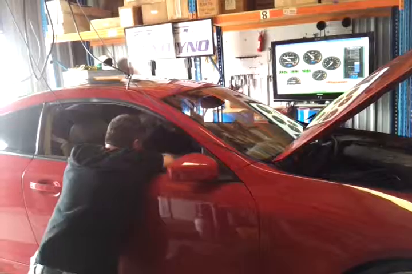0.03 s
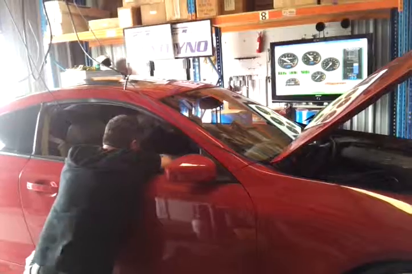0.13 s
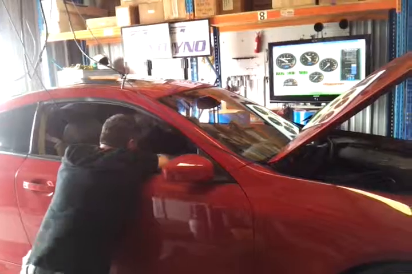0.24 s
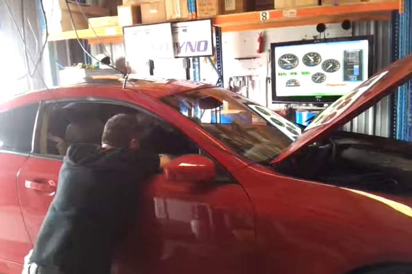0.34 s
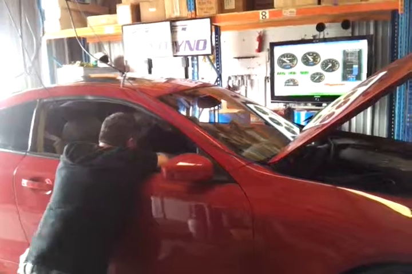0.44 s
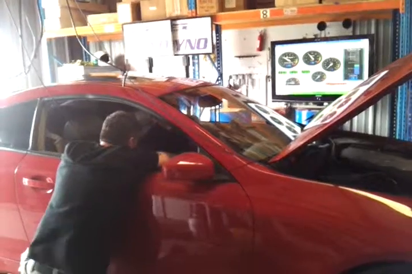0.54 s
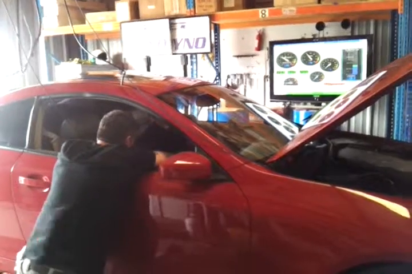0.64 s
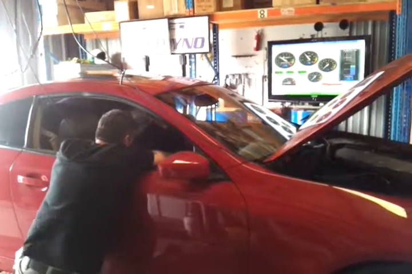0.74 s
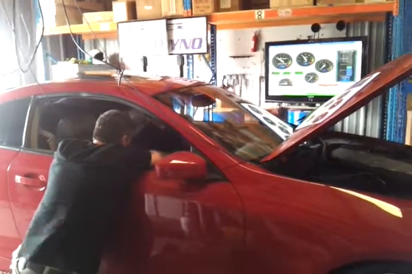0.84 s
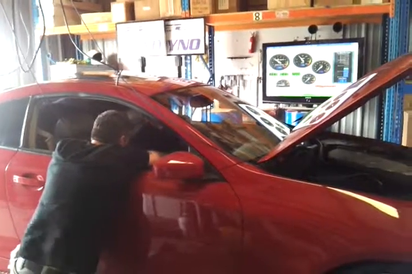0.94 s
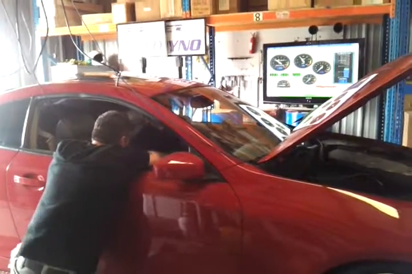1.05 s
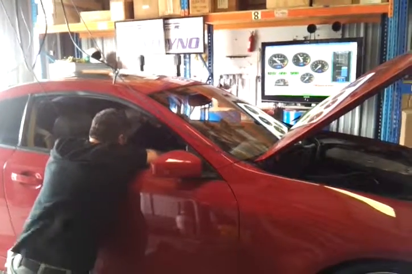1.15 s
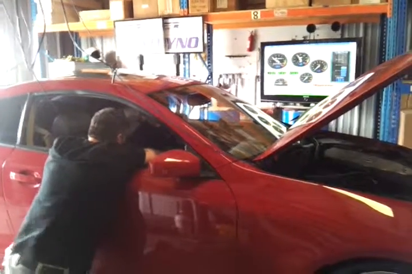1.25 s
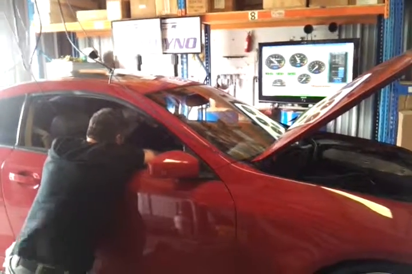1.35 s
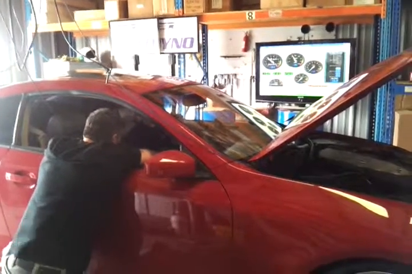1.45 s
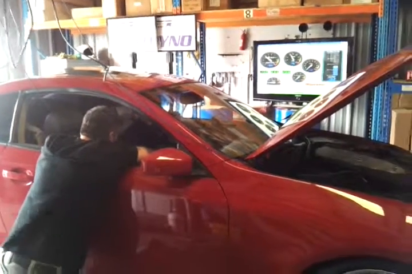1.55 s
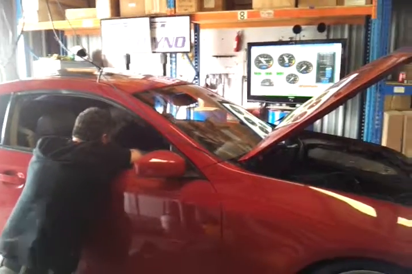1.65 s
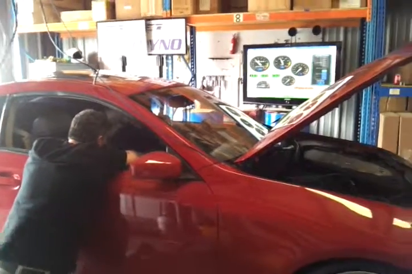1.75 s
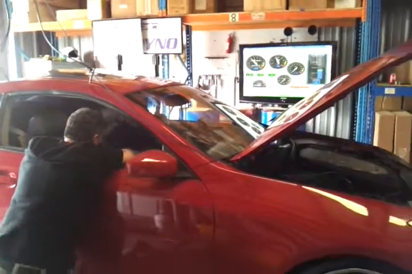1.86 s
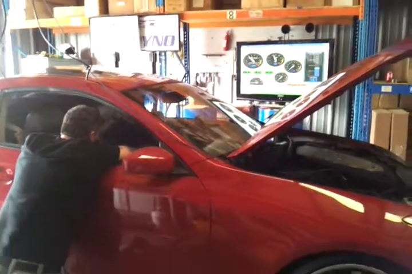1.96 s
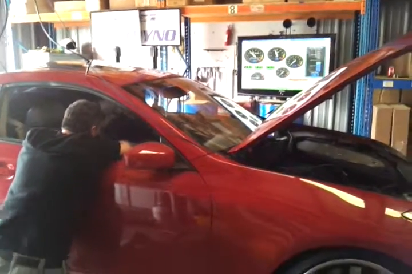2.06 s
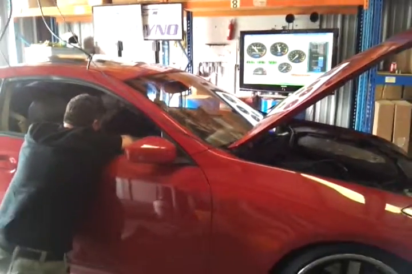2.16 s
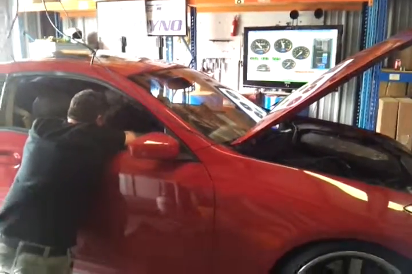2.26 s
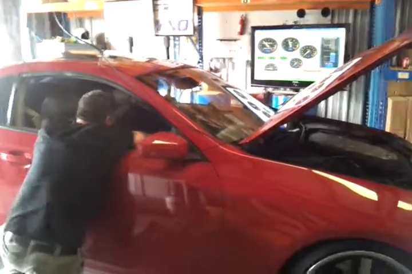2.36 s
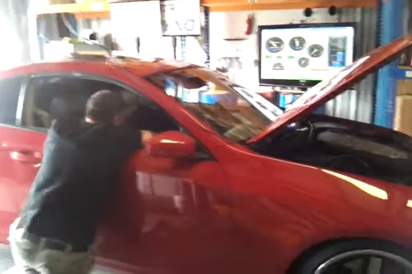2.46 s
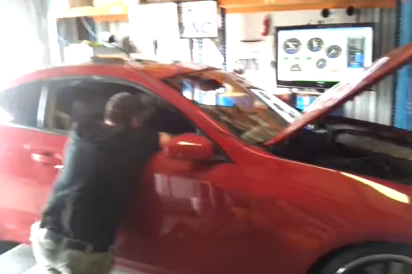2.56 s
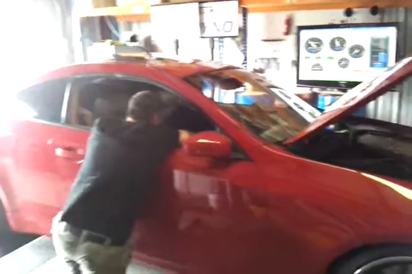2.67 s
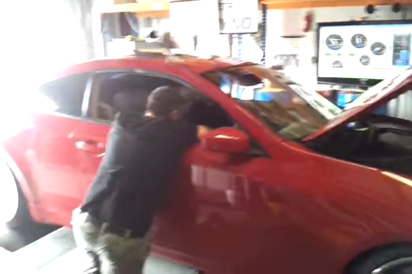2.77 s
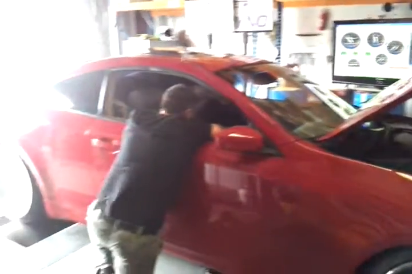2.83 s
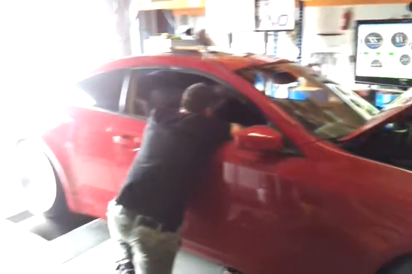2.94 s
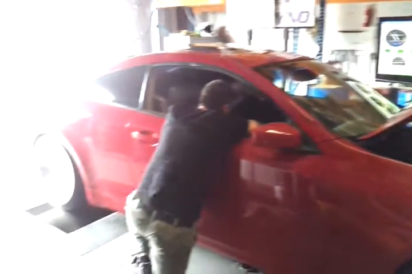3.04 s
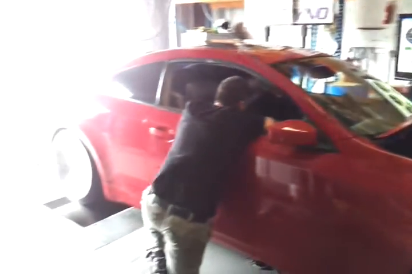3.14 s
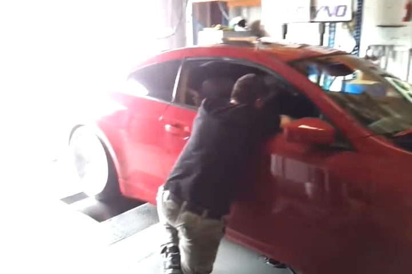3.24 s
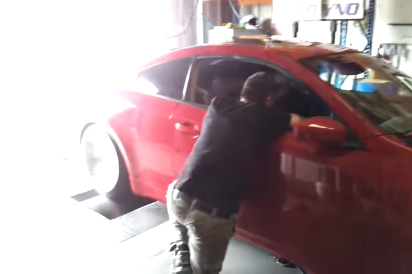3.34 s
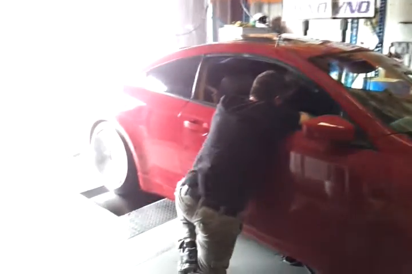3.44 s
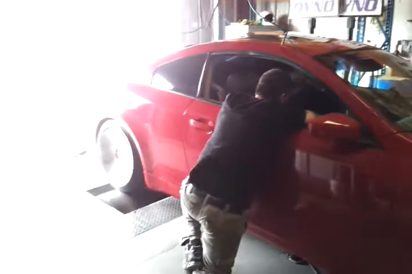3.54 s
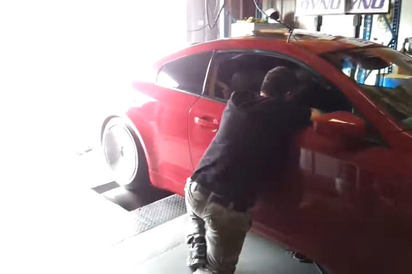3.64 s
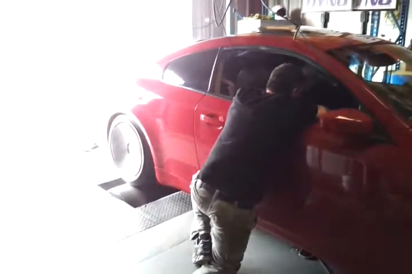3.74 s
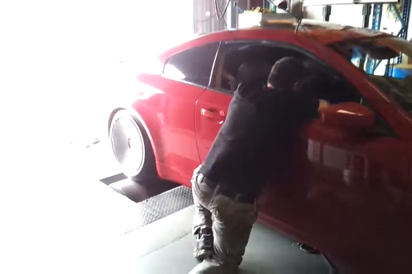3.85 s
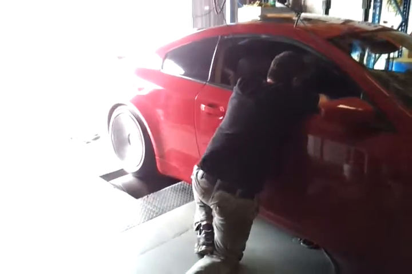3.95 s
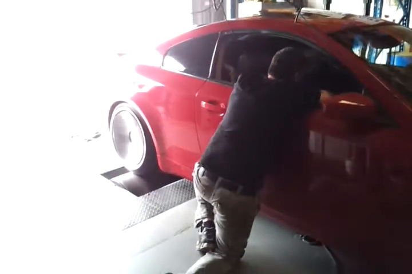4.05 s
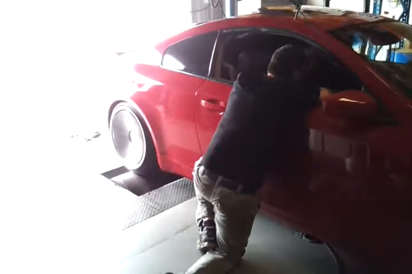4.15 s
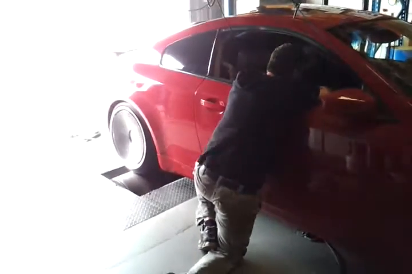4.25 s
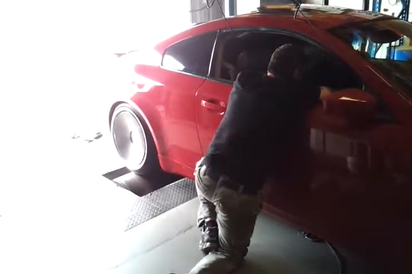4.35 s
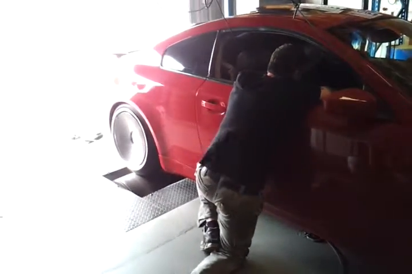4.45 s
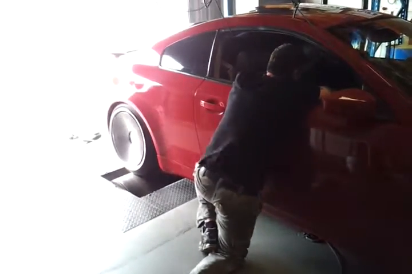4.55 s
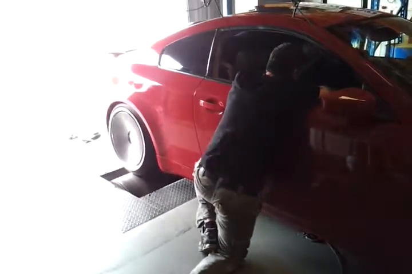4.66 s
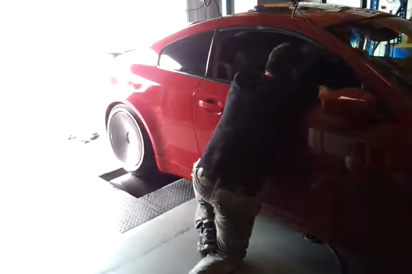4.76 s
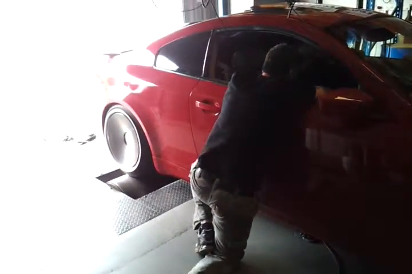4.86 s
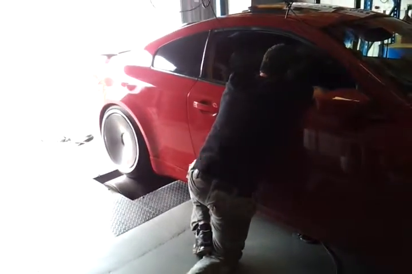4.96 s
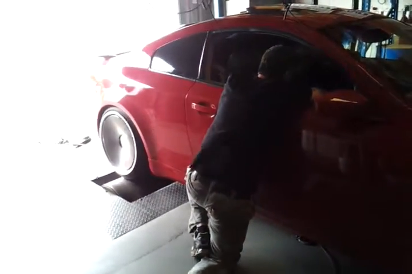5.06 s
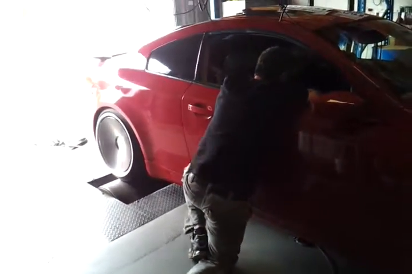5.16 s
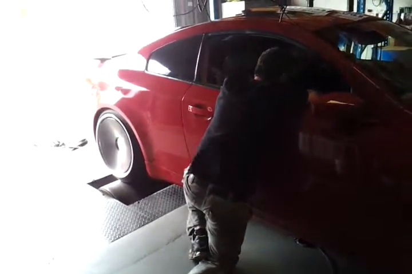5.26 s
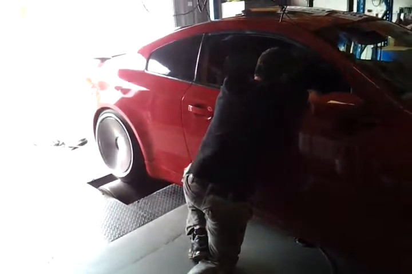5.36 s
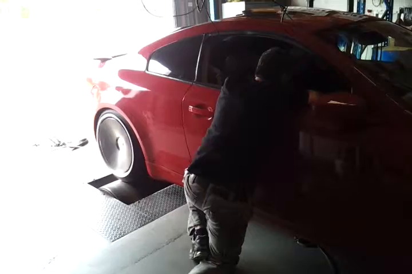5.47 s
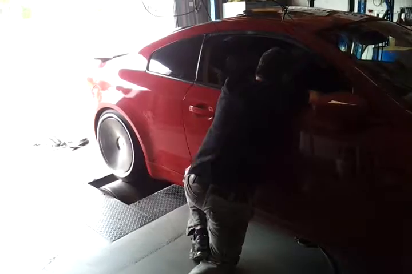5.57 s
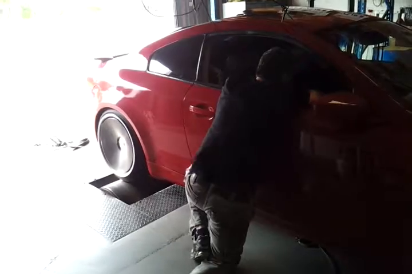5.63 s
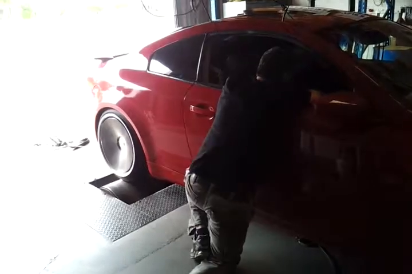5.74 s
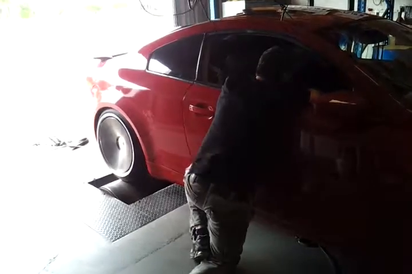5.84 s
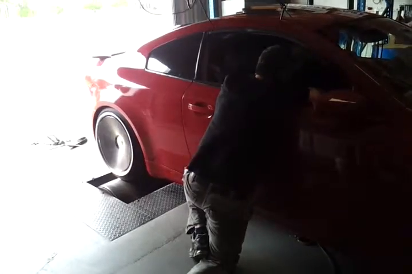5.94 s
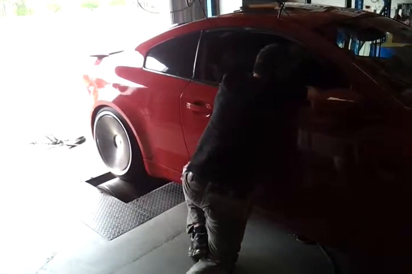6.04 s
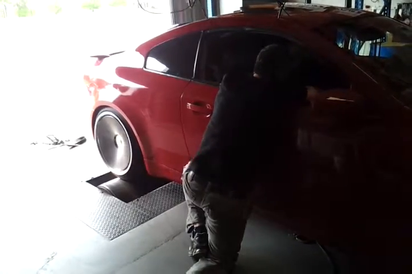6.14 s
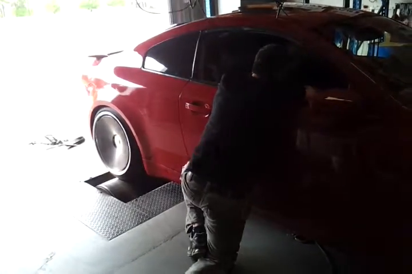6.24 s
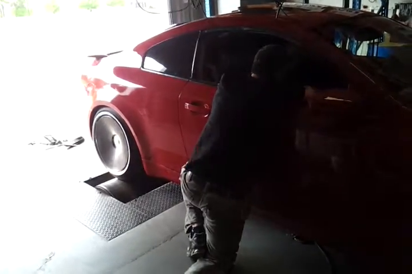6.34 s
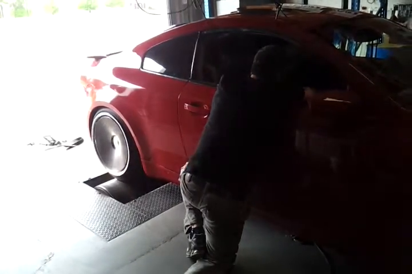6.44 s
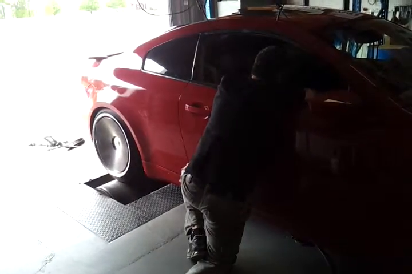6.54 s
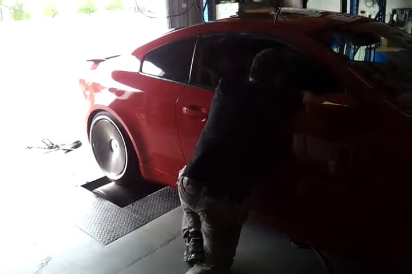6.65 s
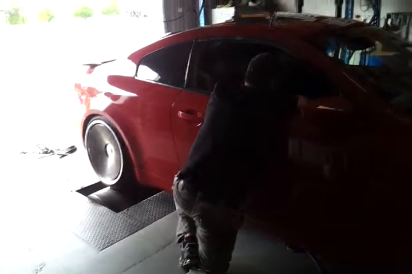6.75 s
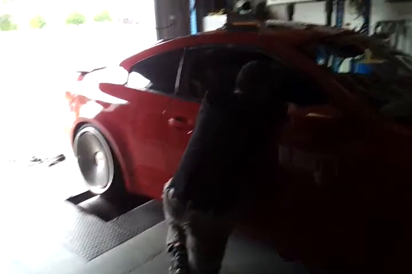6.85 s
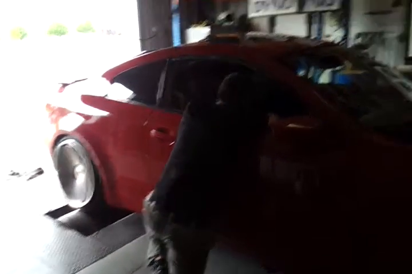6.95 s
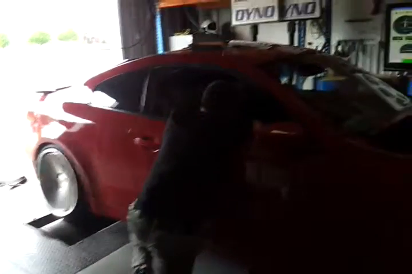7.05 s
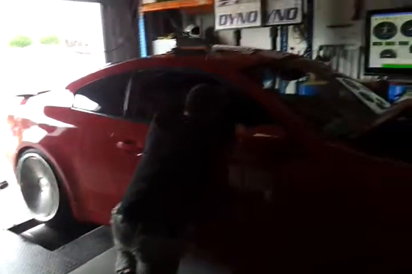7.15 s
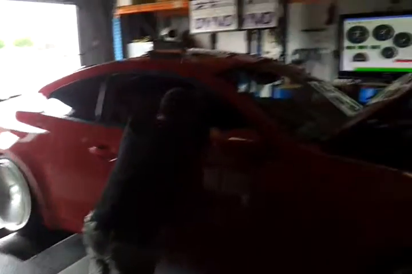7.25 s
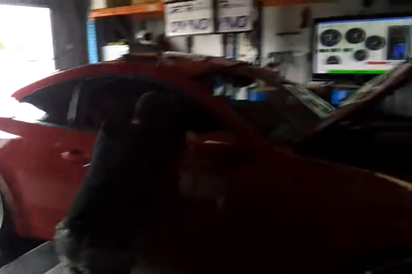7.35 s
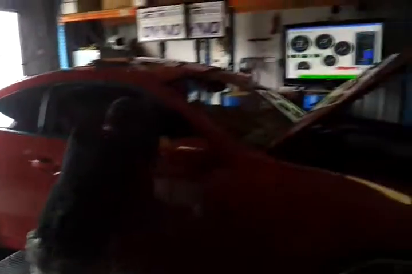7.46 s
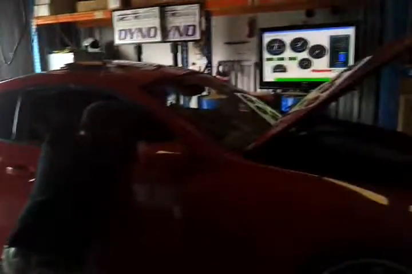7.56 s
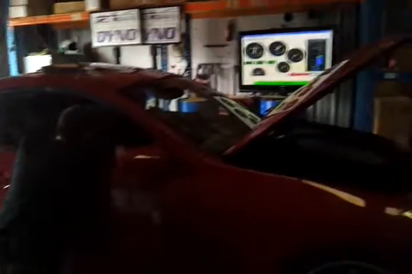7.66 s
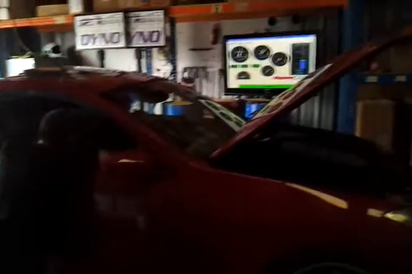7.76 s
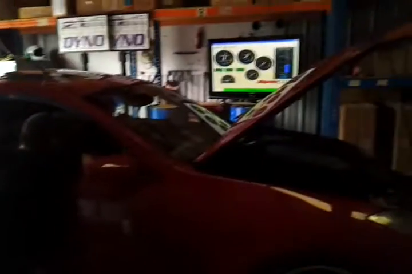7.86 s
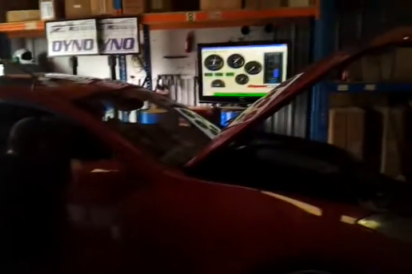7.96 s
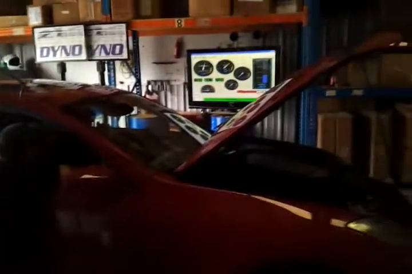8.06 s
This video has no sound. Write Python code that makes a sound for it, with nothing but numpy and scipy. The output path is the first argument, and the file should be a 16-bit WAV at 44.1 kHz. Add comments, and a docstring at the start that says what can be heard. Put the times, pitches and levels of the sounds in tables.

```python
"""After three quarters of a second of silence a V6 fades in quickly, at full throttle on a chassis dyno in a workshop.
Its speed climbs steadily from 3570 rpm and slackens slightly near the end. The exhaust note is a sum of
engine orders, each swelling as it sweeps through the resonances of exhaust, bay and workshop.
Under it runs filtered noise, throbbing with the crank: the rush of intake, tyres and rollers. The din overloads
the microphone into a near square wave: loud orders squeeze the rush out, and it rasps back between them."""
import sys
import numpy as np
from scipy import signal
from scipy.fft import rfft, irfft, next_fast_len
from scipy.io import wavfile
from scipy.ndimage import uniform_filter1d

SR = 44100
rng = np.random.default_rng(int(sys.argv[2]) if len(sys.argv) > 2 else 0)


def wav_record(signal):
    """Record a signal, one row per channel, as 16-bit PCM in the file named by sys.argv[1]."""
    frames = np.transpose(np.atleast_2d(signal))
    bounded = np.clip(frames, -1, 1)
    # unit amplitude maps onto the largest positive 16-bit level
    quanta = np.round(bounded * 32767).astype(np.int16)
    wavfile.write(sys.argv[1], SR, quanta)


N = 357210
TIME = np.arange(N) / SR


def amp(db):
    """Decibels as a linear gain."""
    return 10 ** (np.asarray(db) / 20)


def unit(x):
    """Scales x to an RMS of one."""
    return x / np.sqrt(np.mean(x ** 2) + 1e-20)


def curve(rows):
    """(time [s], value) rows as one value per sample."""
    return np.interp(TIME, *np.transpose(rows))


def along(points, hz):
    """(frequency [Hz], value) points joined along a log frequency axis."""
    f, value = np.transpose(points)
    return np.interp(np.log(hz + 1), np.log(f + 1), value)


def wobble(rate):
    """A smooth random curve with rate knots a second."""
    knots = rng.standard_normal(int(N * rate / SR) + 4)
    fine = signal.resample(knots, len(knots) * 10)
    return np.interp(TIME * rate * 10, np.arange(len(fine)), fine)


def filtered(x, response):
    """Multiplies the spectrum of x by a response of frequency."""
    size = next_fast_len(N + SR // 2)
    spectrum = rfft(x, size) * response(np.fft.rfftfreq(size, 1 / SR))
    return irfft(spectrum, size)[:N]


def engine_rpm():
    """One full-throttle pull: the dyno lets the engine climb at a constant rate that slackens near the top."""
    start_s, start_rpm, climb_rpm_per_s = .75, 3570, 341
    ease_from_s, ease_rpm_per_s2 = 6.5, 7
    climb = climb_rpm_per_s * (TIME - start_s)
    ease = ease_rpm_per_s2 * np.maximum(TIME - ease_from_s, 0) ** 2
    return start_rpm + climb - ease


def exhaust(rpm, angle, puff_skew, waver_db, flutter, flutter_rate):
    """Sums the engine orders; low harmonics of each cylinder bank stay steady, others flutter with combustion."""
    # exhaust note; order 3 is the firing rate, half orders come from unequal cylinders:
    # (order [multiple of the crank rate], level [dB])
    orders = [(.5, -21), (1, -23.5), (1.5, -12), (2, -12.5), (2.5, -10), (3, 5.3), (3.5, -10.5), (4, -16),
              (4.5, -9.5), (5, -16), (5.5, -12.5), (6, 6), (6.5, -10), (7, -12), (7.5, -6.5), (8, -14.5),
              (8.5, -14), (9, -2.5), (9.5, -11), (10, -21.5), (10.5, -9), (12, -9.5), (13.5, -17),
              (15, -9.5), (16.5, -21.5), (18, -12), (19.5, -15), (21, -16)]
    # the cylinders fire less alike as the speed rises, which lifts the low in-between orders
    uneven_db_per_rpm, mid_rpm = .003, 4800
    note = np.zeros(N)
    for order, db in orders:
        hz = order * rpm / 60
        phase = order * angle + puff_skew  # a puff rises and falls at different speeds
        line = bay(hz) * np.exp(1j * phase)
        if order % 3 and order < 6:
            line = line * amp(uneven_db_per_rpm * (rpm - mid_rpm))
        if order % 1.5 or order > 10:
            waver = amp(waver_db * wobble(4))
            # the complex wobble moves level and phase together
            wander = wobble(flutter_rate) + 1j * wobble(flutter_rate)
            line = line * waver * (1 + flutter * wander)
        note += amp(db + workshop_db(hz) + swell_db(order)) * line.real
    return note


def bay(hz):
    """Complex response of exhaust and bay: band-pass resonances that leave notches between them."""
    # resonances of the exhaust and the bay: (centre [Hz], width [Hz], peak [dB])
    resonances = [(100, 96, -5.7), (191.5, 10, -10), (223.7, 0.97, -13.5), (249.24, 14.5, 7.5),
                  (277, 12.5, 4), (370.5, 9.6, -11), (399.5, 21, -8), (431.9, 9.9, 5.5), (444.6, 10.8, 1.5),
                  (474.4, 33.7, 2.3), (485.9, 17.7, 1.94), (526, 11.5, 8), (537.3, 10.8, 5.5),
                  (569, 11, -0.26), (734, 210, -5.5), (983, 180, -12.5), (1273, 640, 3.2), (1582, 91, 6)]
    grid = np.linspace(hz.min(), hz.max(), num=1000)
    response = 0
    for centre, width, db in resonances:
        damping = 1j * grid * width
        response = response + amp(db) * damping / (centre * centre - grid * grid + damping)
    return np.interp(hz, grid, response)


def workshop_db(hz):
    """Gain of the room at the microphone: crests and nodes of its standing waves."""
    # an order swells or drops out as it crosses one: (centre [Hz], half width [Hz], level [dB])
    standing_waves = [(140, 4, 16), (241, 5.5, 4.3), (262, 33, 3.5), (317, 7, 8), (383.5, 5, -5.5),
                      (421.5, 6.5, 4.2), (468, 7, -2), (507, 48, 5.3), (509, 5, -10), (541.2, 3.5, 3.2),
                      (551, 2.8, -14), (578, 21, 5.4), (597.5, 7.7, -9), (665, 24, 10), (745, 40, 4.5)]
    grid = np.linspace(hz.min(), hz.max(), num=1000)
    gain_db = sum(db * np.exp(-((grid - centre) / width) ** 2) for centre, width, db in standing_waves)
    return np.interp(hz, grid, gain_db)


def swell_db(order):
    """Brief bell-shaped rises and falls of one order."""
    # an order sings out or drops away: (time [s], order [multiple of the crank rate], half length [s], level [dB])
    swells = [(1.25, 4.5, .35, -15), (1.28, 7.5, .11, -20), (1.7, 7.5, .3, 4), (2.86, 18, .2, 8),
              (3.36, 12, .36, 10), (3.572, 21, .05, 14), (4.3, 15, .4, 3.5), (4.7, 12, .25, 3),
              (6.6, 12, .13, 14), (7.1, 3, .3, 4.5)]
    return sum(db * np.exp(-((TIME - s) / length) ** 2) for s, k, length, db in swells if k == order)


def rush(angle, firing_depth, cycle_depth):
    """Broad turbulent noise of intake air, tyres and rollers, throbbing with each firing and engine cycle."""
    # tone of the rush: (frequency [Hz], level [dB])
    tone = [(25, -12), (100, -2.5), (300, -5.5), (700, -1.5), (1200, -7), (2200, 2.5), (3000, -0.5),
            (4200, -4.5), (5800, -4.7), (8000, -12), (16000, -20)]
    # the rush surges and dips on its way up: (time [s], level [dB])
    level = [(.75, 1.5), (1.5, 1.5), (2.4, 5.2), (2.65, .3), (3.8, 5.2), (4.3, 2.3), (5.3, 7.8), (5.6, 3.6),
             (6.1, -1), (6.4, 4.5), (8.1, 7.5)]
    air = unit(filtered(rng.standard_normal(N), lambda hz: amp(along(tone, hz))))
    firing = firing_depth * np.cos(3 * angle)
    cycle = cycle_depth * np.cos(angle / 2)  # one cycle takes two crank turns
    return unit(air * (1 + firing + cycle)) * amp(curve(level))


def scene():
    """The crank drives both the exhaust note and the throb of the rush."""
    rpm = engine_rpm()
    angle = 2 * np.pi * np.cumsum(rpm / 60) / SR
    angle = angle + 0.0072 * wobble(30)  # radians; the crank never turns quite evenly
    note = exhaust(rpm, angle, puff_skew=2.337, waver_db=1.5, flutter=0.25, flutter_rate=14)
    air = rush(angle, firing_depth=0.24, cycle_depth=0.18)
    return (note + air)[None]


def ceiling(x, top_db, hardness):
    """Flattens whatever swings past the top; harder corners fizz more."""
    return x / (1 + np.abs(x / amp(top_db)) ** hardness) ** (1 / hardness)


def overload(x, drive_db, hardness, servo_gain):
    """The input stage saturates; its bias settles towards half waves that last equally long."""
    for _ in range(4):
        bias = uniform_filter1d(np.tanh(amp(drive_db) * x), size=SR // 8)
        x = x - servo_gain * bias
    # clip at twice the sample rate to limit aliasing
    driven = amp(drive_db) * signal.resample_poly(x, 2, 1)
    return signal.resample_poly(ceiling(driven, 0, hardness), 1, 2)


def record(dry):
    """Overload, a dull top, a quick fade-in, a last ceiling and the band limit."""
    # tone after the overloaded input: (frequency [Hz], level [dB])
    colour = [(5, -5), (20, -2.5), (1000, 1), (4000, -1), (5800, -1.05), (7000, -6.5), (8000, -18),
              (9000, -40), (12000, -26.5), (15500, -20)]
    # silence, then a quick fade-in: (time [s], gain [linear])
    fade = [(.749, 0), (.751, .18), (.975, 1)]
    top_hz = 15800
    square = amp(-3) * overload(dry[0], drive_db=5, hardness=2.7, servo_gain=2.4)
    dull = filtered(square, lambda hz: amp(along(colour, hz)))
    heard = ceiling(dull * curve(fade), top_db=-2.0, hardness=8.5)
    return filtered(heard, lambda hz: hz < top_hz)[None]


dry = scene()
out = record(dry)
wav_record(out)
```